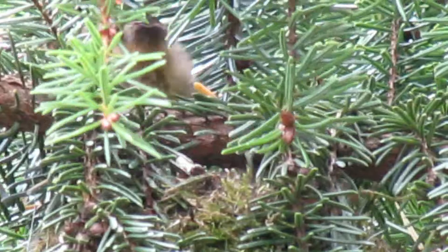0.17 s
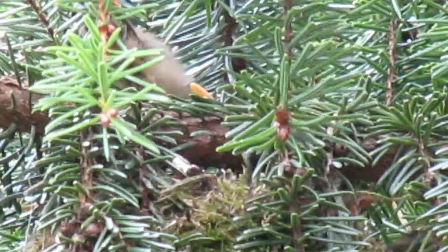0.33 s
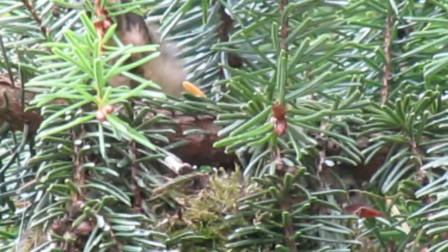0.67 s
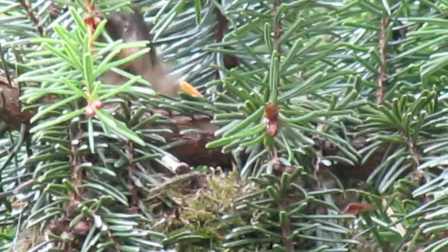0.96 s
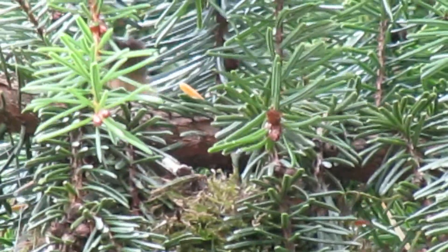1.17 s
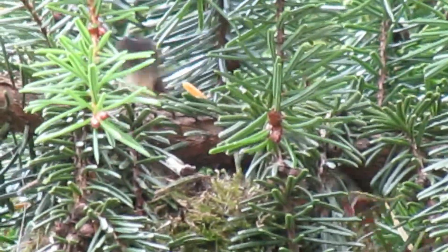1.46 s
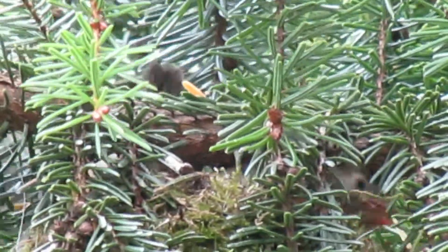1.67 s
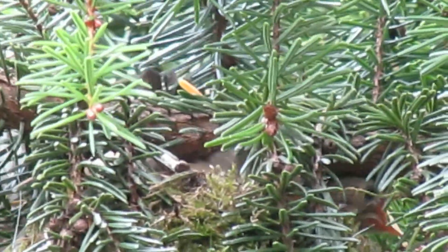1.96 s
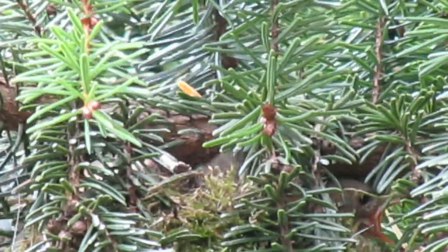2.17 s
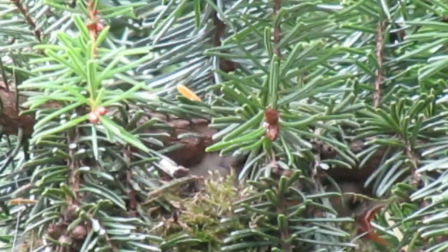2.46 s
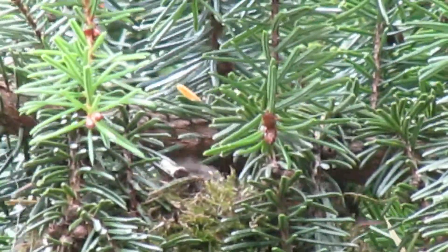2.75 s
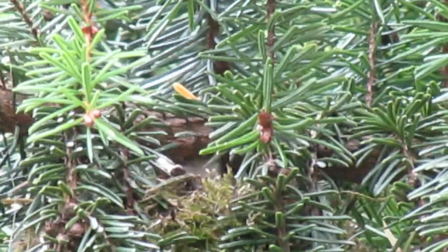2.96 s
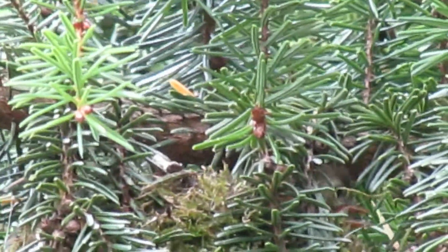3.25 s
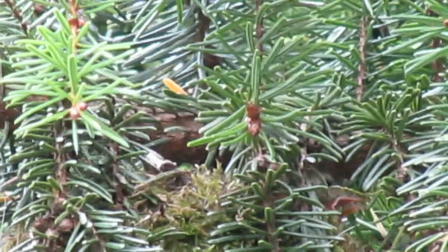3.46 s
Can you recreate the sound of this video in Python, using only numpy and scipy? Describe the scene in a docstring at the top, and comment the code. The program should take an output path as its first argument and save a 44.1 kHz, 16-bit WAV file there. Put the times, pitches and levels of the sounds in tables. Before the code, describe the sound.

Close outdoor stereo pickup of a conifer nest, slightly right of centre: tiny sharp whistled chirps overlap almost continuously, scattered by branches, with faint twig ticks, soft brushing, far whistles, airy hiss and low hum.

```python
"""Thin whistled chirps near 8.5 kHz overlap close by: nestlings beg in a conifer, right of centre.
Each call is a sine on a gliding pitch; random echo taps scatter it among branches and wood.
A distant bird whistles two pairs of notes, half lost in its echo, from enveloped sines.
Needles rustle and twigs tick in filtered noise; behind lie an outdoor hiss of shaped noise
that swells at first, and a low hum of two sines."""
import sys
import numpy as np
from scipy import signal
from scipy.fft import rfft, irfft
from scipy.io import wavfile
from scipy.ndimage import uniform_filter1d

SR = 44100
rng = np.random.default_rng(int(sys.argv[2]) if len(sys.argv) > 2 else 0)


def to_wav(sig):
    """Store sig (one row per channel, or 1-D mono) as 16-bit WAV at the path in sys.argv[1].

    Samples outside -1..1 are clipped; the rate is SR.
    """
    pcm = np.clip(np.atleast_2d(sig), -1, 1) * 32767
    pcm = np.round(pcm).astype(np.int16)
    wavfile.write(sys.argv[1], SR, pcm.T)  # frames by channels


N = 159642  # length [samples]

# Begging chirps that crest, dip and rise again; levels before CHIRP_DB:
# (crest time [s], fall time [s], crest [Hz], dip [Hz], end [Hz], crest level [dB], level from dip on [dB])
CHIRPS = [(0.093, 0.025, 9150, 8070, 9180, -44, -51), (0.212, 0.02, 8270, 7970, 9230, -56, -54.5),
          (0.333, 0.021, 8860, 7970, 8590, -49.5, -55), (0.663, 0.012, 8820, 8220, 8560, -56, -50),
          (0.77, 0.021, 8880, 8260, 9180, -55, -51.5), (0.852, 0.023, 8930, 7980, 8870, -51.5, -54.5),
          (0.885, 0.02, 8820, 8140, 8590, -45, -54), (0.962, 0.022, 9030, 8100, 9050, -45, -52.5),
          (1.061, 0.023, 9040, 7960, 8960, -47, -54.5), (1.151, 0.012, 8020, 7920, 8560, -54, -56),
          (1.317, 0.014, 9080, 8460, 8940, -47.5, -45.5), (1.405, 0.024, 8950, 8520, 9140, -52, -52),
          (1.459, 0.024, 9010, 7870, 8600, -45, -54), (1.57, 0.022, 9160, 8270, 8900, -47.5, -50.5),
          (1.617, 0.016, 8900, 8280, 8380, -52, -54), (1.679, 0.018, 8910, 8270, 8980, -55, -57.5),
          (1.784, 0.017, 8930, 7990, 9120, -51.5, -52.5), (1.905, 0.019, 9140, 8400, 9040, -48.5, -52),
          (1.926, 0.021, 8670, 7960, 8720, -52, -52), (2.009, 0.019, 9130, 8350, 9060, -47.5, -49),
          (2.112, 0.024, 9100, 8100, 8910, -48, -46.5), (2.225, 0.021, 8650, 8520, 9000, -54, -49),
          (2.343, 0.024, 9050, 8250, 9060, -49, -50.5), (2.443, 0.02, 8570, 8450, 9040, -55, -48.5),
          (2.56, 0.018, 9000, 8200, 8760, -52, -57), (2.669, 0.013, 8660, 8550, 9020, -54.5, -49.5),
          (2.749, 0.021, 8830, 7940, 8710, -51, -53), (2.781, 0.014, 8620, 8520, 8920, -52, -50.5),
          (2.868, 0.021, 8800, 8040, 8990, -47.5, -44.5), (2.998, 0.013, 8530, 8290, 9130, -52, -48),
          (3.023, 0.016, 9160, 8300, 9090, -44, -45.5), (3.132, 0.023, 8770, 8030, 8400, -46.5, -50),
          (3.217, 0.016, 7900, 7780, 8460, -55, -48), (3.228, 0.016, 8910, 8240, 9010, -48.5, -56),
          (3.255, 0.0167, 8980, 8360, 8580, -50, -53), (3.32, 0.016, 8820, 8080, 8990, -49, -58),
          (3.356, 0.016, 9110, 8280, 8680, -49.5, -56), (3.437, 0.018, 8750, 8120, 8900, -48.5, -56),
          (3.48, 0.021, 9070, 8270, 8990, -50, -53), (3.585, 0.013, 8920, 8030, 8400, -58, -57)]
# Slurred chirps that arch over and plunge; levels before SLUR_DB:
# (crest time [s], fall time [s], crest [Hz], level [dB])
SLURS = [(0.606, 0.027, 8710, -50), (0.712, 0.036, 8570, -54.5), (1.283, 0.024, 8630, -51.5),
         (2.118, 0.042, 9100, -49.5), (2.187, 0.026, 8520, -52.5), (2.237, 0.035, 8590, -46.5),
         (2.307, 0.026, 8600, -52.5), (2.602, 0.023, 8920, -57.5), (3.301, 0.03, 8730, -46.5),
         (3.318, 0.022, 8540, -49)]
# Strongest reflections from boughs near the nest: (delay [s], level relative to the call [dB])
BOUGHS = [(.0045, -14), (.009, -11.5), (0.0144, -9.5), (.021, -11.5)]
# Soft peeps from deeper in the nest; levels before the PEEP gains:
# (start time [s], length [s], middle pitch [Hz], level [dB])
PEEPS = [(0.543, 0.025, 8130, -61), (.586, 0.018, 8520, -55), (0.809, .025, 8550, -53.5),
         (.902, 0.022, 8220, -57), (1.17, .025, 8500, -59), (1.392, 0.028, 8170, -56),
         (1.579, 0.036, 8350, -52), (2.068, 0.036, 7980, -58), (2.416, .025, 8450, -54),
         (2.5, 0.049, 8120, -60), (2.62, 0.018, 7880, -56), (2.95, .055, 8030, -58),
         (3.181, .03, 8200, -58), (3.33, 0.034, 8250, -52), (3.463, 0.031, 8180, -52),
         (3.589, 0.022, 8150, -56)]
# Distant whistles; levels before the FAR gains:
# (start time [s], length [s], pitch [Hz], depth of the opening scoop [Hz], level [dB])
WHISTLES = [(0.679, 0.12, 4375, 136, -59.5), (0.897, 0.098, 4340, 300, -57), (2.797, 0.098, 4400, 37, -58),
            (3.052, 0.088, 4230, 15, -52.5)]
# Faint ticks of twigs and needles; starting level before the high-pass: (time [s], level [dB])
TICKS = [(.291, -61), (1.223, -57), (1.401, -50), (1.757, -51), (1.94, -53), (2.285, -53)]
# Soft brushes through the needles: (middle time [s], half length [s], level [dB])
RUSTLES = [(1.16, 0.036, -64), (1.31, 0.035, -73), (1.457, .06, -58), (1.71, .04, -63), (1.87, .03, -53),
           (2.268, .04, -56), (3.244, .05, -57), (3.36, .05, -57), (3.476, 0.053, -54.5)]
# Spectral shape of the outdoor hiss: (frequency [Hz], relative density [dB per Hz])
HISS = [(20, -17), (35, -4), (80, 2), (160, 0.5), (300, 2), (550, 1), (1000, 1.05), (1500, -3.5),
        (2300, -8.5), (4000, -9.5), (6000, -10.5), (8000, -11.5), (10000, -16.5), (13000, -19.5),
        (15800, -24)]
# Swell of the hiss, on top of HISS_DB: (time [s], level [dB])
SWELL = [(0, -5), (.3, -3.5), (.55, -2.5), (.9, -0.84), (1.2, 0), (1.5, 0.5), (2.3, 0.5), (3.0, 0.53),
         (3.6, 0)]
# Left-right likeness of the hiss: (frequency [Hz], correlation before the lag [0 to 1])
LIKENESS = [(50, .15), (130, 0.55), (290, 0.39), (640, 0.14), (1400, 0.12), (3100, 0.13), (6800, 0.43),
            (10500, 0.36), (15000, .15)]
# Phase by which the left channel of the hiss lags: (frequency [Hz], lag [radians])
LAG = [(50, 1), (130, 2.96), (290, 2.94), (640, 1.75), (1000, 1.12), (3800, 0.53), (7500, 1.15),
       (9600, 2.1), (15000, 2.7)]
# Low hum; levels before the channel gains: (time [s], pitch [Hz], level [dB])
HUM = [(0, 50.5, -57.5), (.8, 51.63, -57.5), (1.5, 52.64, -53.5), (2.1, 53.7, -58), (2.65, 52.4, -57),
       (2.9, 53.3, -66), (3.6, 52.1, -55.5)]

# Nestlings
CHIRP_DB, SLUR_DB = -0.5, -1
ONSET_S, ONSET_HZ, ATTACK_S = 0.009, 484, 0.0034  # the upsweep into the crest
REBOUND, RELEASE_S = 0.622, 0.0041  # rising time as a share of the fall time; fade at the end
SLUR_LEAD_S, SLUR_END_HZ, SLUR_FADE_DB = 0.011, 7300, -8  # pitch and fade reached at the fall time
JITTER_HZ, FLUTTER_DB, TREMBLE_S = 55, 1.8, 0.0018  # random pitch and level, and their step
BRANCH_DB, BRANCH_T60, BRANCH_GAP_S = -4, 0.22, 0.003  # scatter close to the nest; T60 [s]
WOOD_DB, WOOD_T60 = -11.5, 0.7  # longer scatter from the wood; T60 [s]
LEFT_LAG_S = 0.000009  # the nest is just right of centre
PEEP_SAG_HZ, PEEP_JITTER_HZ, PEEP_DIRECT_DB, PEEP_ECHO_DB = 160, 70, -0.5, 0
# Distant bird
WHISTLE_SCOOP_S, WHISTLE_WAVER_HZ, WHISTLE_EDGE_S, WHISTLE_FLUTTER_DB = 0.0112, 30.6, 0.01, 2.5
FAR_DIRECT_DB, FAR_ECHO_DB, FAR_T60 = 1, -1.5, 0.86  # T60 [s]
FAR_SLAP_S, FAR_SLAP_DB = 0.125, -10.5  # one late reflection
# Foliage and background
TICK_S = 0.0024  # decay time constant
RUSTLE_LOW_HZ, RUSTLE_HIGH_HZ, RUSTLE_GRAIN_DB = 3200, 8000, 4.5
HISS_DB, PATCH_DB, FLICKER_DB = -47.5, 0.5, 0.6
TREBLE_SWELL, TREBLE_FROM_HZ = 0.72, 3100  # how much further the treble swells than the body
HUM_WAVER_DB, HUM_LEFT_DB, HUM_RIGHT_DB, HUM_OCTAVE_DB = 1, 2, -5, -19
EDGE_HZ = 15780  # upper limit of the band


def amp(db):
    """Decibels to gain."""
    return 10 ** (np.asarray(db) / 20)


def unit(x):
    """Scales to an rms of 1."""
    return x / np.sqrt(np.mean(x ** 2) + 1e-20)


def read(points, hz):
    """Reads a table on a log-frequency axis."""
    f, value = np.transpose(points)
    return np.interp(np.log(hz + 1), np.log(f + 1), value)


def add(mix, s, sound):
    """Mixes a sound in at time s, cutting what runs past the end."""
    part = mix[max(round(s * SR), 0):][:len(sound)]
    part += sound[:len(part)]


def wander(t, step_s):
    """A random curve that moves in straight lines to a new value every step."""
    return np.interp((t - t[0]) / step_s, np.arange(256), rng.standard_normal(size=256))


def whistle(t, hz, db, attack_s, release_s):
    """A pure tone on a pitch curve and an rms level curve, with soft ends."""
    fade_in = np.clip((t - t[0]) / attack_s, 0, 1)
    fade_out = np.clip((t[-1] - t) / release_s, 0, 1)
    phase = 2 * np.pi * np.cumsum(hz) / SR
    return np.sqrt(2) * fade_in * fade_out * amp(db) * np.sin(phase)


def scatter(x, t60, gap_s):
    """Echoes from foliage: sparse dying taps, different for each channel."""
    t = np.arange(SR) / SR
    taps = rng.standard_normal((2, SR)) * (rng.random((2, SR)) < 0.1)
    taps = taps * (t > gap_s) * np.exp(-np.log(1000) * t / t60)
    taps = taps / np.linalg.norm(taps, axis=1, keepdims=True)
    return signal.fftconvolve(x[None], taps, axes=1)[:, :N]


def chirp(crest_s, fall_s, crest_hz, dip_hz, end_hz, crest_db, late_db):
    """The pitch swings smoothly up to a crest, down to a dip and up again."""
    top_s = fall_s * (1 + REBOUND)
    t = np.arange(-ONSET_S, top_s + RELEASE_S, 1 / SR)
    leg = np.interp(t, [0, fall_s, top_s], [0, 1, 2])
    eased = np.floor(leg) + np.sin(np.pi / 2 * (leg % 1)) ** 2
    upsweep = ONSET_HZ * (np.minimum(t, 0) / ONSET_S) ** 2
    hz = np.interp(eased, [0, 1, 2], [crest_hz, dip_hz, end_hz]) - upsweep
    db = CHIRP_DB + np.interp(t, [0, fall_s], [crest_db, late_db])
    db = db + FLUTTER_DB * wander(t, TREMBLE_S)
    hz = hz + JITTER_HZ * wander(t, TREMBLE_S)
    return crest_s - ONSET_S, whistle(t, hz, db, ATTACK_S, RELEASE_S)


def slur(crest_s, fall_s, crest_hz, level_db):
    """The pitch arches over and falls ever faster as the voice fades."""
    t = np.arange(-SLUR_LEAD_S, fall_s + RELEASE_S / 2, 1 / SR)
    drop = (t / fall_s) ** 2
    hz = crest_hz + (SLUR_END_HZ - crest_hz) * drop + JITTER_HZ * wander(t, TREMBLE_S)
    db = SLUR_DB + level_db + SLUR_FADE_DB * drop + FLUTTER_DB * wander(t, TREMBLE_S)
    return crest_s - SLUR_LEAD_S, whistle(t, hz, db, ATTACK_S, RELEASE_S)


def nestlings():
    """Begging chirps and slurs close by, with echoes from boughs, branches and wood."""
    voices = np.zeros(N)
    for row in CHIRPS:
        add(voices, *chirp(*row))
    for row in SLURS:
        add(voices, *slur(*row))
    right = voices.copy()
    for delay_s, db in BOUGHS:
        add(right, delay_s, amp(db) * voices)
    # the left channel hears the nest a fraction of a sample later
    delay = np.exp(-2j * np.pi * np.fft.rfftfreq(N, 1 / SR) * LEFT_LAG_S)
    left = irfft(rfft(right) * delay, N)
    branches = amp(BRANCH_DB) * scatter(voices, BRANCH_T60, BRANCH_GAP_S)
    wood = amp(WOOD_DB) * scatter(voices, WOOD_T60, gap_s=0.013)
    return np.array([left, right]) + branches + wood


def peeps():
    """Soft, slightly sagging calls from deeper in the nest, joined by strong branch echoes."""
    voices = np.zeros(N)
    for start, length, pitch_hz, db in PEEPS:
        t = np.arange(0, length, 1 / SR)
        sag = PEEP_SAG_HZ * (0.5 - t / length)
        hz = pitch_hz + sag + PEEP_JITTER_HZ * wander(t, TREMBLE_S)
        add(voices, start, whistle(t, hz, db, ATTACK_S, RELEASE_S))
    echoes = amp(PEEP_ECHO_DB) * scatter(voices, BRANCH_T60, BRANCH_GAP_S)
    return amp(PEEP_DIRECT_DB) * voices + echoes


def far_bird():
    """Level notes with an upward scoop, half lost in their echo; one reflection comes back late."""
    voice, slap = np.zeros(N), np.zeros(N)
    for start, length, pitch_hz, scoop_hz, level_db in WHISTLES:
        t = np.arange(0, length, 1 / SR)
        scoop = scoop_hz * np.exp(-t / WHISTLE_SCOOP_S)
        hz = pitch_hz - scoop + WHISTLE_WAVER_HZ * wander(t, step_s=0.0052)
        db = level_db + WHISTLE_FLUTTER_DB * wander(t, step_s=0.0122)
        add(voice, start, whistle(t, hz, db, WHISTLE_EDGE_S, WHISTLE_EDGE_S))
    add(slap, FAR_SLAP_S, voice)
    echoes = amp(FAR_ECHO_DB) * scatter(voice, FAR_T60, gap_s=0.005)
    return amp(FAR_DIRECT_DB) * voice + amp(FAR_SLAP_DB) * slap + echoes


def twigs():
    """Tiny dry ticks in the foliage: dying noise bursts, high-passed and scattered."""
    ticks, t = np.zeros(N), np.arange(0, 0.02, 1 / SR)
    for s, db in TICKS:
        add(ticks, s, amp(db) * np.exp(-t / TICK_S) * rng.standard_normal(len(t)))
    ticks = signal.sosfilt(signal.butter(2, 2500, "high", fs=SR, output="sos"), ticks)
    return ticks + amp(BRANCH_DB) * scatter(ticks, BRANCH_T60, BRANCH_GAP_S)


def rustle():
    """Needles brush against each other: band-passed grainy noise in short swells."""
    t = np.arange(N) / SR
    level = sum(amp(db) * np.exp(-((t - s) / half_s) ** 2) for s, half_s, db in RUSTLES)
    noise = rng.standard_normal((2, N))
    grain = unit(uniform_filter1d(rng.standard_normal(N), size=60))  # shared by both channels
    band = signal.butter(1, [RUSTLE_LOW_HZ, RUSTLE_HIGH_HZ], "band", fs=SR, output="sos")
    return level * unit(signal.sosfilt(band, noise * amp(RUSTLE_GRAIN_DB * grain)))


def hiss():
    """Wide, smooth outdoor noise with faint drifting patches; it brightens as it swells."""
    frames, hz = N // 256 + 5, np.fft.rfftfreq(1024, 1 / SR)
    a, b, c, d, patches = rng.standard_normal((5, frames, len(hz)))
    # smooth the patches over time, then over frequency
    patches = uniform_filter1d(patches, size=10, axis=0)
    patches = unit(uniform_filter1d(patches, size=16, axis=1))
    # the right channel shares part of the left, more where the likeness is high
    same = np.clip(read(LIKENESS, hz), -1, 1)
    shared, own = a + 1j * b, c + 1j * d
    left = shared * np.exp(-1j * read(LAG, hz))
    right = same * shared + np.sqrt(1 - same ** 2) * own
    swell_db = np.interp(np.arange(N) / SR, *np.transpose(SWELL))
    frame_swell_db = swell_db[np.linspace(0, N - 1, frames).astype(int), None]
    treble = hz ** 2 / (hz ** 2 + TREBLE_FROM_HZ ** 2)
    bright_db = TREBLE_SWELL * frame_swell_db * treble
    flicker_db = FLICKER_DB * rng.standard_normal((frames, 1))
    spectrum = np.array([left, right])
    spectrum = spectrum * amp(read(HISS, hz) + bright_db + PATCH_DB * patches + flicker_db)
    noise = signal.istft(spectrum.swapaxes(1, 2), nperseg=1024, noverlap=768)[1][:, :N]
    return unit(noise) * amp(HISS_DB + swell_db)


def hum():
    """A wavering low drone with a weak octave, stronger on the left."""
    t = np.arange(N) / SR
    s, hz, db = np.transpose(HUM)
    phase = 2 * np.pi * np.cumsum(np.interp(t, s, hz)) / SR
    phase = phase + np.array([[0], [np.pi / 2]])  # the right leads by a quarter turn
    level = amp(np.interp(t, s, db) + HUM_WAVER_DB * wander(t, step_s=0.06))
    level = level * amp([[HUM_LEFT_DB], [HUM_RIGHT_DB]])
    return np.sqrt(2) * level * (np.sin(phase) + amp(HUM_OCTAVE_DB) * np.sin(2 * phase))


def scene():
    """The nest close by, the far bird, the foliage and the background."""
    return nestlings() + peeps() + far_bird() + twigs() + rustle() + hiss() + hum()


def record(dry):
    """The recorder opens after a moment of silence and limits the band with a steep low-pass."""
    opened = np.clip((np.arange(N) / SR - 0.035) / 0.002, 0, 1)
    lowpass = signal.firwin(1023, EDGE_HZ, window=("kaiser", 9), fs=SR)
    return signal.oaconvolve(dry * opened, lowpass[None], "same")


dry = scene()
out = record(dry)
to_wav(out)
```